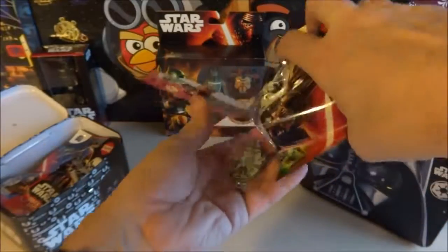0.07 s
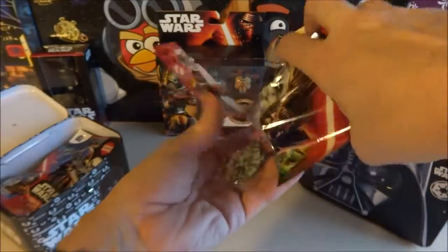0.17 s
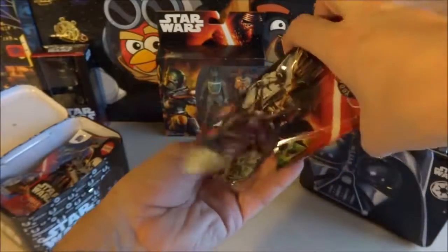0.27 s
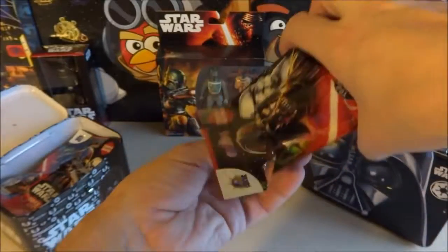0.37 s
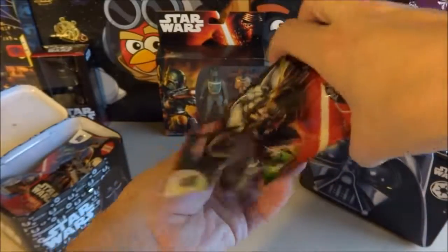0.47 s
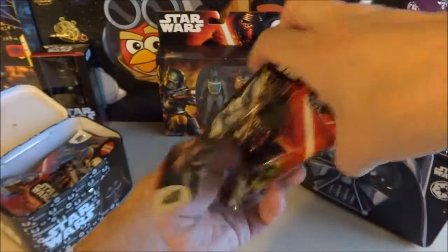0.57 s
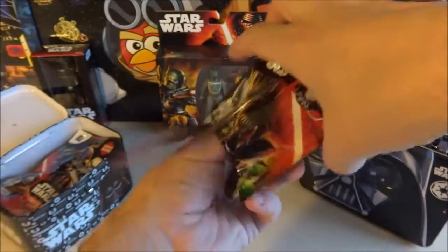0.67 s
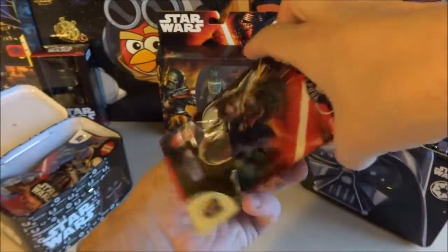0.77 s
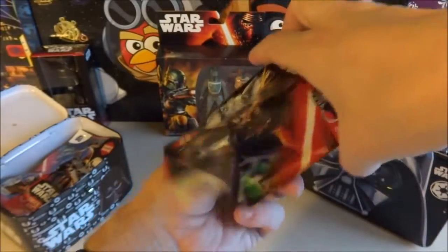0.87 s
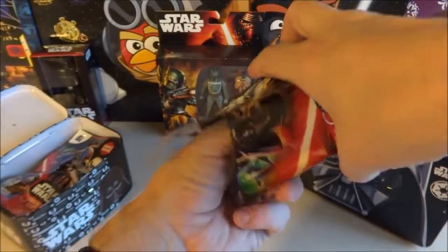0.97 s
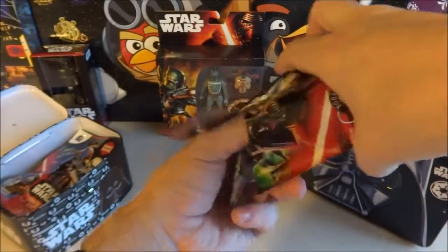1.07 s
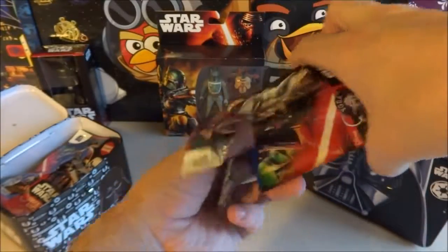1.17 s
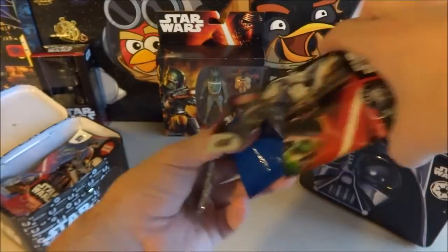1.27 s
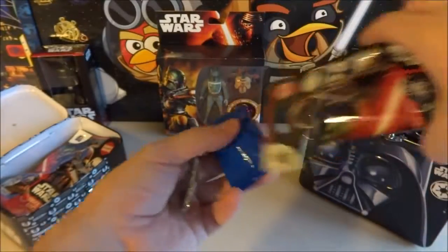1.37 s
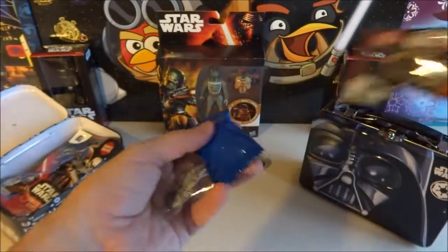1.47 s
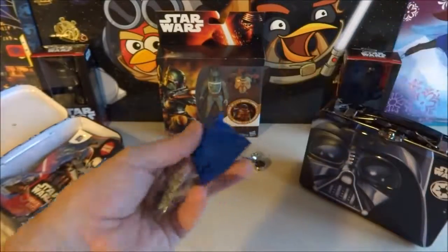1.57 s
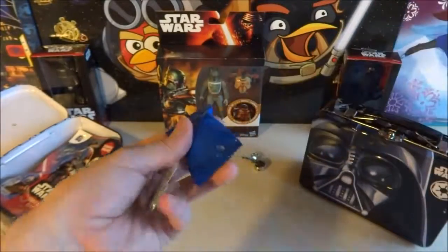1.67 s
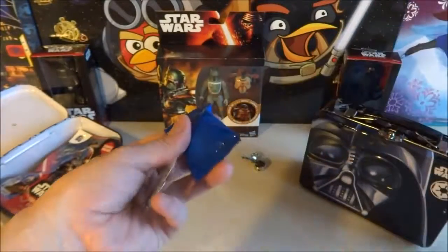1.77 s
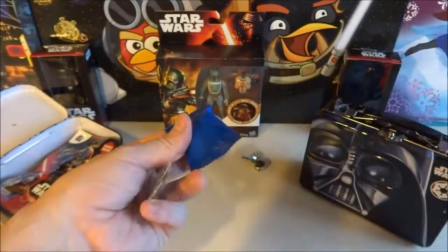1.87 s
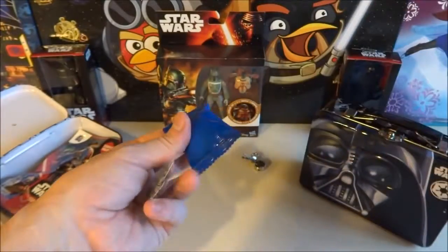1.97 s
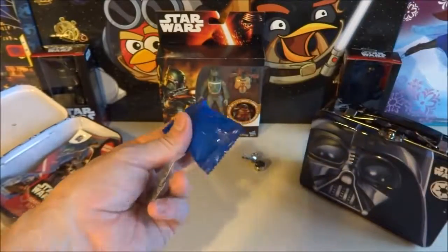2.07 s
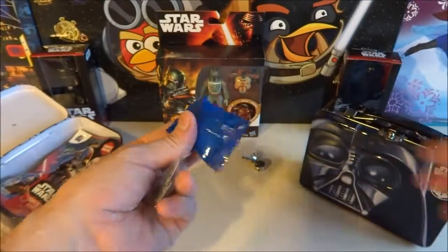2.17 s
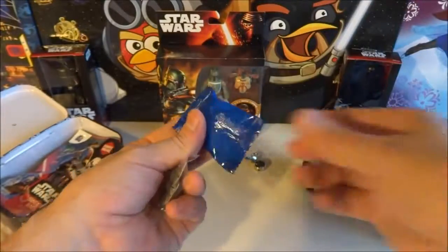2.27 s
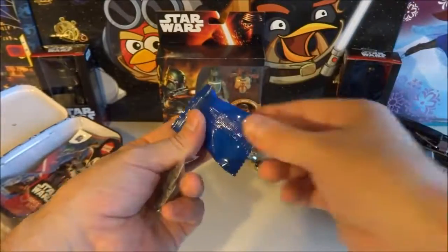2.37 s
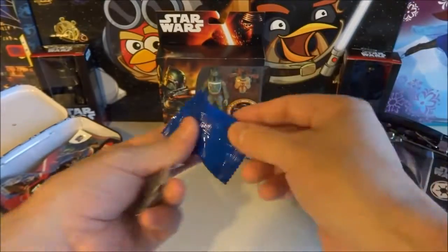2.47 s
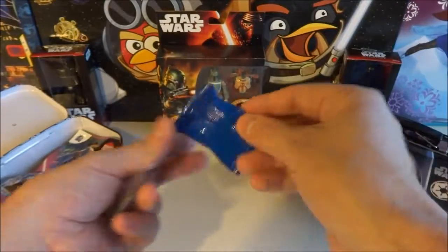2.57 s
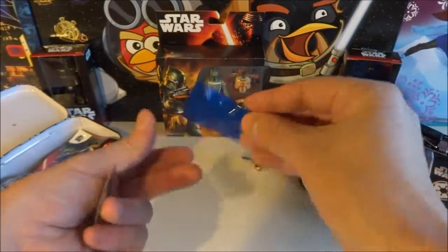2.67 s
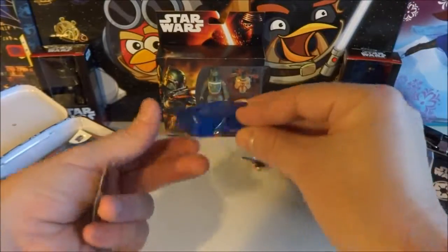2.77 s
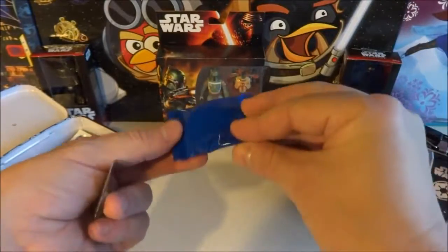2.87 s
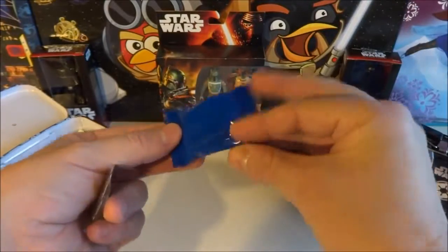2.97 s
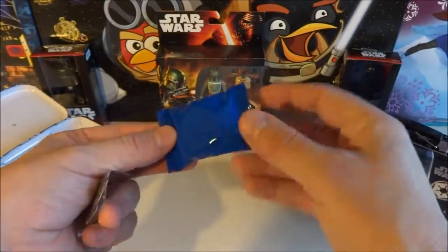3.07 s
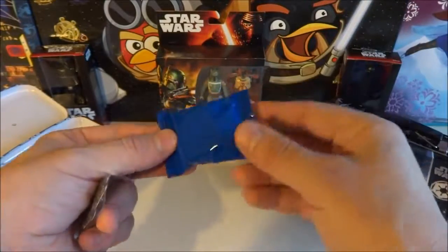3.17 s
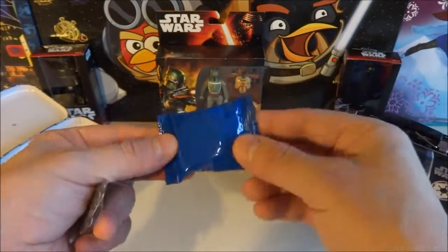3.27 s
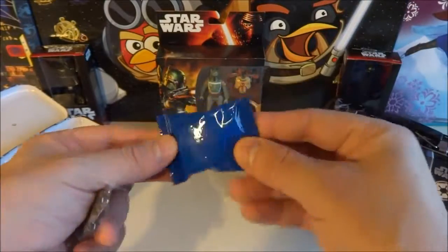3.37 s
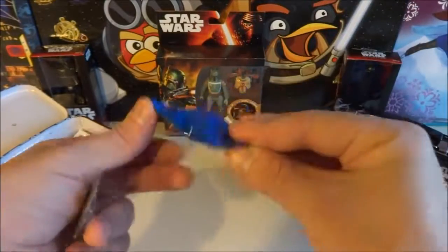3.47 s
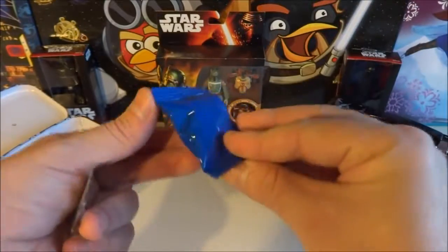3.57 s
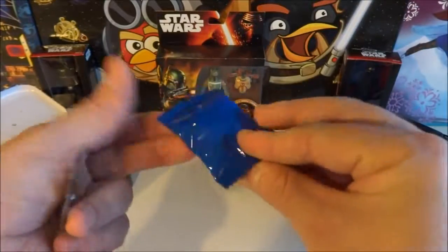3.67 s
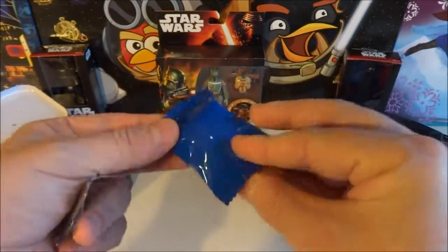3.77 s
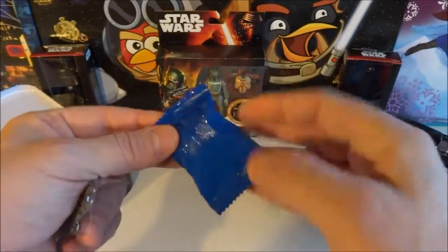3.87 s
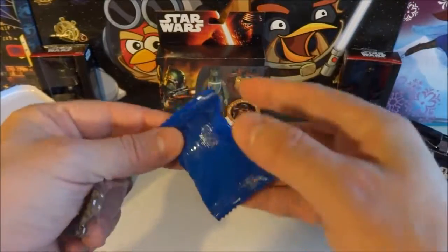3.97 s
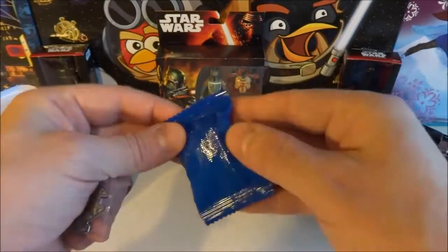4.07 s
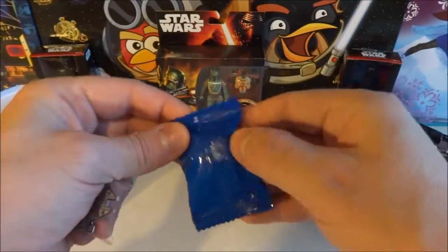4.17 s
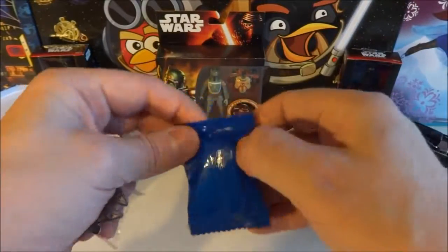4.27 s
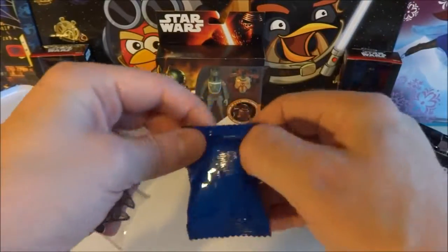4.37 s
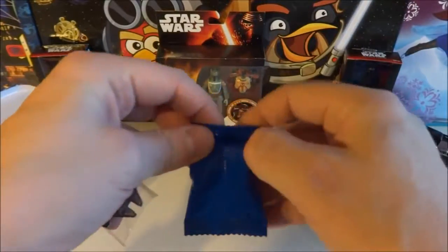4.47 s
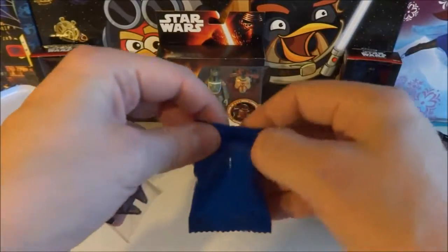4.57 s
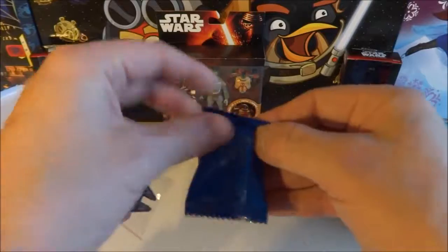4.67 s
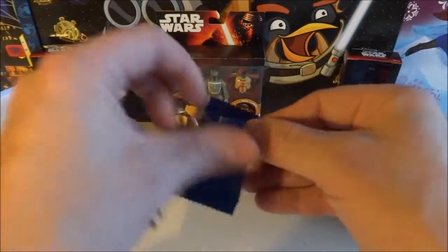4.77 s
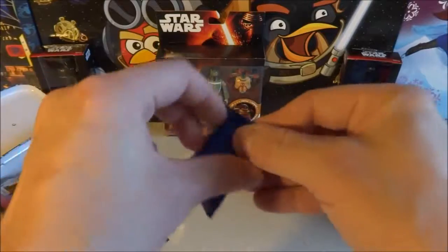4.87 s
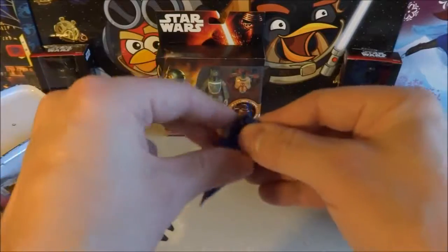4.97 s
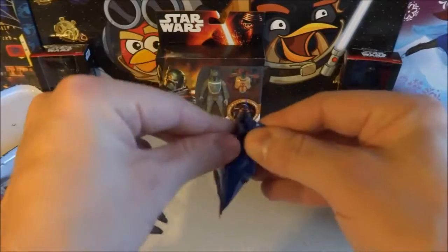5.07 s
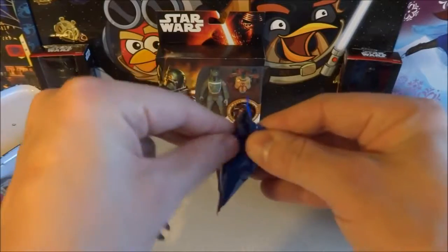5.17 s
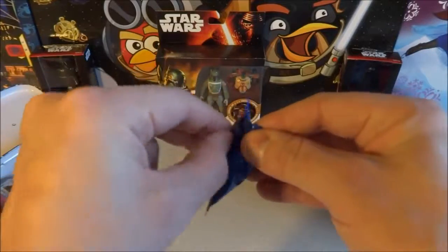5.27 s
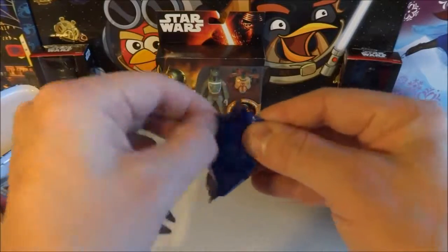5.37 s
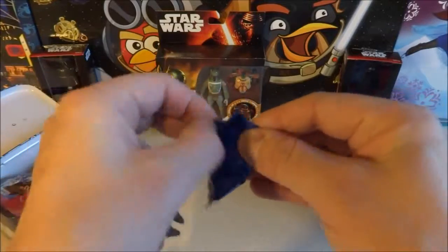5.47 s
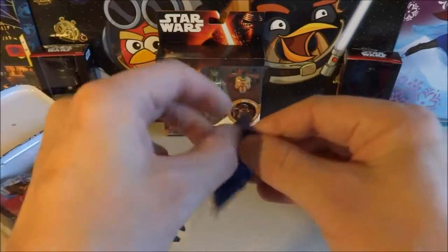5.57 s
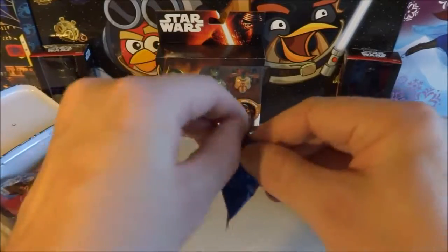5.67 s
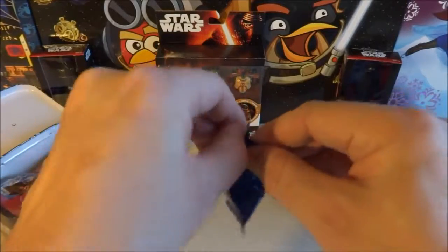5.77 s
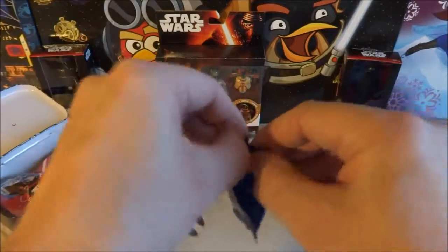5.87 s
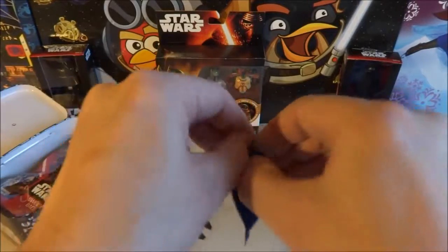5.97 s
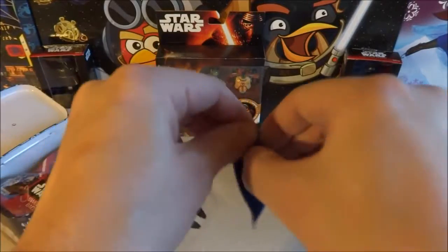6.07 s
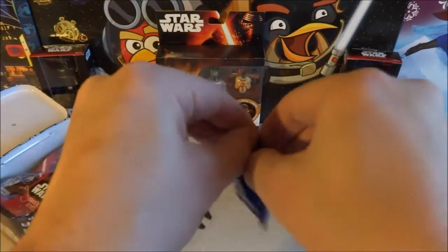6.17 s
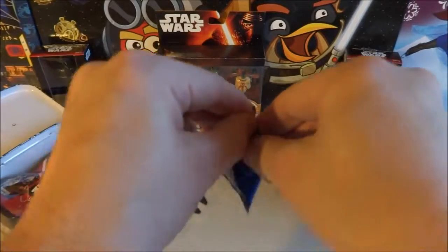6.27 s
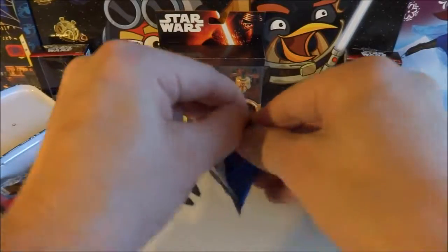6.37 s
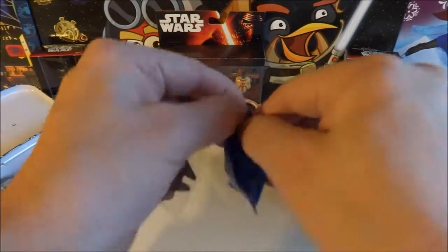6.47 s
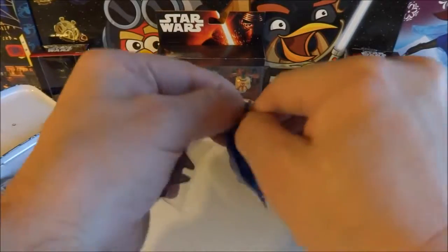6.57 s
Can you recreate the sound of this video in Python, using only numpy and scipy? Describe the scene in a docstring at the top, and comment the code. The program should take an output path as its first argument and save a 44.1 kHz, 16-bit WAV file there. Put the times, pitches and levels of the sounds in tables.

```python
"""Crinkly plastic film snaps and crumples: hands pull a small foil sachet out of a bag, turn it and pinch its seam.
Single creases snap as a click with a short flutter; collapsing folds are flurries of tiny clicks with larger cracks.
Between them the film rustles: filtered clicks and hiss follow how firmly the fingers slide.
A small room adds a fading noise tail to every film sound; soft air noise and a thin two-tone whine lie below."""
import sys
import numpy as np
from scipy import signal
from scipy.fft import rfft, irfft
from scipy.io import wavfile
from scipy.ndimage import uniform_filter1d, minimum_filter1d

SR = 44100
rng = np.random.default_rng(int(sys.argv[2]) if len(sys.argv) > 2 else 0)


def generate_wav(signal):
    """Clip the signal to [-1, 1] and save it as 16-bit WAV at the path in sys.argv[1]."""
    frames = np.transpose(np.atleast_2d(signal))
    scaled = np.clip(frames, -1, 1) * 32767
    pcm = np.round(scaled).astype(np.int16)
    wavfile.write(sys.argv[1], SR, pcm)


N = 292383  # length in samples
TIME = np.arange(N) / SR
TOP_HZ = 16300  # no sound is wanted above this
SIZE = 2048  # samples in a filter or in one crease sound
FREQS = np.maximum(np.fft.rfftfreq(SIZE, 1 / SR), 1)
BAG_STILL_S, BAG_GONE_S = 1.56, 2.15  # the bag's rustle stops; later snaps and folds are the sachet's
LOADING_S = 0.012  # a crease is loaded for this long before it flips

# folds that collapse: (start [s], length [s], level before mixing [dB], pitch of the facets [Hz])
FOLDS = [(0.004, 0.065, -28, 3280), (0.185, 0.044, -34, 5830), (0.598, 0.036, -21, 3080),
         (0.65, 0.09, -22.5, 3540), (0.749, 0.067, -28.5, 1620), (0.826, 0.041, -23.5, 2340),
         (0.951, 0.091, -23.5, 2930), (1.077, 0.033, -25, 2340), (1.161, 0.15, -29.5, 2630),
         (1.353, 0.098, -29.5, 3780), (2.018, .035, -29, 3340), (2.085, 0.05, -36.5, 1940),
         (3.053, .018, -25.5, 2900), (3.283, 0.027, -32.5, 1900), (3.384, 0.097, -29, 4600),
         (3.456, 0.097, -30, 2420), (3.878, .034, -22.5, 2650), (4.977, 0.073, -24, 3380),
         (5.066, 0.054, -29.5, 1510), (5.276, .055, -22.5, 2270), (5.4, .088, -20, 7000),
         (5.621, 0.072, -26, 1740), (5.955, 0.044, -20.5, 8000), (6, 0.051, -23.5, 7800),
         (6.049, .028, -23.5, 4700), (6.172, 0.042, -26.5, 11300), (6.22, 0.045, -20, 12700),
         (6.355, 0.051, -25.5, 15400), (6.586, .02, -32, 11100)]


def undb(db):
    """Turn decibels into a plain factor."""
    return 10 ** (np.asarray(db) / 20)


def unit(x):
    """Scale a signal to an average (RMS) level of 1."""
    return x / np.sqrt(np.mean(x ** 2) + 1e-18)


def colour(points, freqs=FREQS):
    """Draw a smooth gain curve through (frequency [Hz], level [dB]) points."""
    hz, db = np.transpose(points)
    return undb(np.interp(np.log(freqs), np.log(hz), db))


def ring(x, gain, spread_s=0.0):
    """Pass x through a body with this gain that rings only after it is struck; bass waves arrive after treble."""
    # folding the cepstrum puts the body's energy as early as possible
    cepstrum = irfft(np.log(gain + 1e-9))
    cepstrum[1:SIZE // 2] *= 2
    cepstrum[SIZE // 2 + 1:] = 0
    # bending waves: the delay grows as 1 / sqrt(frequency), from spread_s / 4 at the highest frequency
    lag = 2 * np.pi * spread_s * np.sqrt(FREQS * FREQS[-1]) / 2
    response = irfft(np.exp(rfft(cepstrum) - 1j * lag))[:SIZE // 2]
    return signal.oaconvolve(x, response)


def add(out, s, sound):
    """Mix a sound in at time s."""
    start = max(int(s * SR), 0)
    part = sound[:max(N - start, 0)]
    out[start:start + len(part)] += part


def facet(s, hz, q, sheet=0.084, ripple_db=3.0, count=40):
    """A damped facet of film stands out of its sheet's broad sound, with uneven side resonances of its own."""
    # broad sound of each film: (frequency [Hz], level [dB])
    bag_colour = [(60, -34), (150, -12.5), (287, -4), (470, -9), (730, -1), (1200, -1), (2100, -1),
                  (4200, -2), (10000, -14), (15500, -19)]
    sachet_colour = [(120, -50), (290, -27.5), (470, -26.5), (720, -7.5), (1300, -4), (2300, -2),
                     (3200, -1), (4900, -1.5), (10000, -6.5), (15500, -12)]
    film = colour(bag_colour if s < BAG_GONE_S else sachet_colour)
    detune = q * (FREQS / hz - hz / FREQS)
    resonance = 1 / (1 + detune ** 2)
    ripple_hz = np.geomspace(500, TOP_HZ, count)
    ripple = colour(np.transpose([ripple_hz, ripple_db * rng.standard_normal(count)]))
    return film * ripple * (sheet + resonance)


def crackle(count, per_s, spread_db, hiss):
    """Tiny buckles click at random moments, a few much larger than the rest, over friction hiss."""
    sizes = undb(spread_db * np.minimum(rng.exponential(size=count), 3))
    clicks = (rng.random(count) < per_s / SR) * sizes * rng.choice([-1, 1], count)
    return unit(clicks) + hiss * rng.standard_normal(count)


def background(air_db=-53.0):
    """Soft room noise is filtered noise, wider than mono; the steady thin whine is two sine waves."""
    # sound of the quiet room: (frequency [Hz], level [dB])
    air_colour = [(25, -15), (100, -10), (290, 2), (550, 8), (1200, 14.5), (4000, 7), (8000, -17),
                  (16000, -28)]
    # steady whine: (frequency [Hz], level [dB])
    whine_tones = [(823, -64.5), (1233, -62.5)]
    mid, side = (unit(ring(rng.standard_normal(N), colour(air_colour))[:N]) for _ in range(2))
    air = undb(air_db) * np.array([mid + side / 2, mid - side / 2])
    whine = sum(np.sqrt(2) * undb(db) * np.sin(2 * np.pi * hz * TIME) for hz, db in whine_tones)
    return air + whine


def effort(settle_db=-19.5, settle_s=0.031):
    """The film moves as the fingers slide, and goes on settling for a moment after each fold collapses."""
    # how firmly the fingers slide over the film: (time [s], level [dB])
    finger_slide = [(0, -35), (0.25, -44), (0.7, -33.5), (1.2, -33.5), (1.6, -41), (2.05, -38.5),
                    (2.36, -46.5), (2.52, -36.5), (3.25, -43), (3.5, -37.5), (3.93, -40.5), (4.08, -41),
                    (4.28, -40), (4.8, -34.5), (5.1, -38.5), (5.9, -32.5), (6.12, -41), (6.6, -36.5)]
    motion = undb(np.interp(TIME, *np.transpose(finger_slide)))
    for s, length, db, hz in FOLDS:
        settling = undb(db + settle_db) * np.exp(-TIME[:SR // 2] / settle_s)
        add(motion, s + length, settling)
    return motion


def ticks(s, per_s, lowest_hz, q=1.24, spread_s=0.000785, count=9):
    """Small facets of different pitch tick independently, each with a colour of its own."""
    total = 0
    for hz in np.geomspace(lowest_hz, TOP_HZ, count):
        grains = crackle(N, per_s, spread_db=6.5, hiss=0.55)
        total = total + ring(grains, facet(s, hz, q), spread_s)[:N]
    return unit(total)


def rustle(bag_db=-1, tick_db=-2, slide_db=-7, slide_hz=3800, firm_db=-38, bag_firm_db=-37):
    """A harder pull makes the bag crackle more; the sachet hisses under a light touch and ticks under a firm one."""
    motion = effort()
    # both reach their full value of 1 once the movement is firm
    grip = np.minimum(motion / undb(firm_db), 1)
    pull = np.minimum(motion / undb(bag_firm_db), 1)
    bag = undb(bag_db) * np.sqrt(pull) * ticks(0, per_s=90, lowest_hz=302)
    sachet = undb(tick_db) * grip ** 2 * ticks(BAG_GONE_S, per_s=16, lowest_hz=810)
    hiss = ring(rng.standard_normal(N), facet(BAG_GONE_S, slide_hz, 0.97, sheet=0.04))[:N]
    slide = undb(slide_db) * unit(hiss)
    return motion * np.where(TIME < BAG_STILL_S, bag, slide + sachet)


def buckle(s, hz, q, flutter=0.11, flutter_s=0.0026, shiver=0.027, shiver_s=0.0066,
           jerk=0.41, jerk_s=0.0033, creak=0.016, creak_s=0.013, spread_s=0.000142):
    """A crease creaks as it is loaded, flips with a click and two more jerks, and the sheet flutters briefly."""
    lead, window = int(LOADING_S * SR), int(0.004 * SR)
    t = TIME[:SIZE] - lead / SR  # the flip is at zero
    before = creak * np.exp(-np.abs(t) / creak_s)
    after = flutter * np.exp(-np.abs(t) / flutter_s) + shiver * np.exp(-np.abs(t) / shiver_s)
    push = rng.standard_normal(SIZE) * np.where(t < 0, before, after)
    push[lead] += 1
    jerk_moments = lead + (rng.random(2) * jerk_s * SR).astype(int)
    push[jerk_moments] += jerk * rng.uniform(-1.32, 1, 2)
    sound = ring(push * rng.choice([-1, 1]), facet(s, hz, q), spread_s)
    # level 1 over the first 4 ms of the flip
    return sound / np.sqrt(np.mean(sound[lead:lead + window] ** 2))


def snaps():
    """Single creases flip as the fingers change their grip."""
    # creases: (time [s], level over 4 ms before mixing [dB], pitch of the facet [Hz], resonance sharpness [Q])
    creases = [(0.0152, -22.5, 7900, 0.29), (0.0424, -19.5, 3200, 1.3), (0.347, -28, 2810, 0.78),
               (0.388, -29, 1690, 0.11), (0.5342, -26, 2520, .9), (0.6226, -15, 1800, 1.2),
               (0.7146, -14.5, 2360, 0.07), (0.8598, -17, 1180, 0.16), (1.000, -16, 3400, 0.062),
               (1.089, -10, 10960, 0.027), (1.1692, -13.5, 3880, .05), (1.2349, -15.5, 4030, 0.31),
               (1.4763, -22, 10960, 0.42), (1.4963, -14.5, 6260, 0.27), (1.6661, -19, 8080, 0.6),
               (1.762, -20.5, 4650, 0.36), (1.8682, -31, 5100, 0.12), (1.9539, -26, 14000, .4),
               (2.2247, -23.5, 3350, 1.7), (2.5254, -12.5, 840, 0.14), (2.6156, -15, 3930, 0.31),
               (2.64, -13.5, 3000, 0.64), (2.6625, -20.5, 7040, .55), (2.7399, -23, 2900, 0.54),
               (2.796, -23, 1770, 0.084), (2.8129, -16, 4740, 0.26), (2.862, -17.5, 5300, 1.9),
               (3.0531, -14, 700, 0.2), (3.1197, -14.5, 4250, 1.3), (3.245, -31, 3230, .7),
               (3.302, -16, 4800, 2.5), (3.4115, -16.5, 5560, .7), (3.5033, -16.5, 6320, 0.025),
               (3.5266, -16, 1970, 0.16), (3.5975, -9, 6760, 0.21), (3.701, -25, 5160, 1.4),
               (3.7147, -22, 3500, 0.092), (3.8392, -21.5, 3420, 5.8), (3.8544, -23.5, 2780, 0.3),
               (3.9028, -14, 1690, 0.064), (3.9815, -25, 13700, 0.52), (4.177, -18, 10960, .1),
               (4.209, -17, 3600, 0.032), (4.2396, -24, 4950, 0.29), (4.315, -13.5, 14000, 0.19),
               (4.3874, -16.5, 2780, 0.19), (4.4369, -17.5, 4470, 0.45), (4.5071, -18, 1400, 0.21),
               (4.6152, -21.5, 13170, 1.6), (4.6328, -15, 13900, .5), (4.7003, -16, 14000, 0.43),
               (4.7283, -12.5, 4260, 0.47), (4.7748, -17, 4470, 0.23), (4.7912, -20, 3070, 0.22),
               (4.8286, -15.5, 14000, 0.24), (4.9123, -22.5, 14000, 0.062), (4.9737, -15, 1360, 1.8),
               (5.0348, -14, 6270, 0.7), (5.1493, -14.5, 6500, 0.033), (5.2158, -17.5, 3830, 0.56),
               (5.3037, -18.5, 1640, 2.5), (5.3527, -22.5, 7900, 1.2), (5.389, -9.5, 6500, 1.1),
               (5.6192, -14, 1660, 0.36), (5.7563, -13, 12390, .27), (5.792, -21, 6000, 0.24),
               (5.8937, -21.5, 14000, 0.082), (6.1646, -21, 7800, 1.1), (6.2806, -17, 10310, 0.12),
               (6.4545, -25.5, 10900, 1.8), (6.5379, -17.5, 13100, 0.55), (6.5828, -21, 9700, 1.8),
               (6.614, -15, 8000, 0.53)]
    out = np.zeros(N)
    for s, db, hz, q in creases:
        add(out, s - LOADING_S, undb(db) * buckle(s, hz, q))
    return out


def crumples(q=0.29, octaves=1.0, per_s=420, spread_s=0.00081, count=4):
    """A fold gives way: a few facets of different pitch chatter, each in its own flurry of clicks."""
    out = np.zeros(N)
    chatter = [crackle(N, per_s, spread_db=3.5, hiss=0.28) for _ in range(count)]
    for s, length, db, hz in FOLDS:
        start, size = max(int(s * SR), 0), max(int(length * SR), 2)
        progress = np.linspace(0, 1, size)
        sound = 0
        for grains, step in zip(chatter, np.linspace(-1, 1, count)):
            # each flurry is strongest at its own random moment
            swell = np.exp(-((progress - rng.random()) / 0.5) ** 2)
            flurry = signal.windows.tukey(size, 0.3) * swell
            body = facet(s, hz * 2 ** (octaves * step), q)
            sound = sound + ring(grains[start:start + size] * flurry, body, spread_s)
        add(out, s, sound * undb(db) / np.sqrt(np.mean(sound[:size] ** 2)))
    return out


def cascades(above_db=4, scatter_db=1.5, octaves=0.57, q=0.66, count=3):
    """Each fold trips a few larger creases in turn: cracks near its pitch, with weak shiver and strong jerks."""
    out = np.zeros(N)
    for s, length, db, hz in FOLDS:
        moments = s + length * (np.arange(count) + rng.random(count)) / count
        for moment, (size, step) in zip(moments, rng.standard_normal((count, 2))):
            pitch = hz * 2 ** (octaves * step)
            crack = buckle(moment, pitch, q, flutter=0.12, shiver=0.014, jerk=0.62)
            add(out, moment - LOADING_S, undb(db + above_db + scatter_db * size) * crack)
    return out


def strays(above_db=9, scatter_db=4, centre_hz=4500, octaves=1.76, q=0.67, firm_db=-37, count=55):
    """Now and then a small crease flips anywhere in the film, strongly only while the grip is firm."""
    out, motion = np.zeros(N), effort()
    load = motion * np.minimum(motion / undb(firm_db), 1)
    moments = TIME[-1] * (np.arange(count) + rng.random(count)) / count
    for s, (size, step) in zip(moments, rng.uniform(-0.92, 1, (count, 2))):
        strength = np.interp(s, TIME, load) * undb(above_db + scatter_db * size)
        add(out, s - LOADING_S, strength * buckle(s, centre_hz * 2 ** (octaves * step), q))
    return out


def room(x, wet_db=-9.0, t60=0.31, treble_t60=0.27, split_hz=6000, gap_s=0.004):
    """The room answers after a few milliseconds with fading noise; the treble dies first and stays narrow."""
    t = TIME[:SR // 2]
    width, treble_width = 0.58, 0.25  # left-right difference against the middle
    tails = 0
    for kind, decay_s, spread in (("low", t60, width), ("high", treble_t60, treble_width)):
        band = signal.butter(2, min(split_hz, SR / 3), kind, fs=SR, output="sos")
        fade = np.exp(-np.log(1000) * t / decay_s) * (t > gap_s)  # falls by 60 dB in decay_s
        mid, side = signal.sosfilt(band, rng.standard_normal((2, len(t)))) * fade
        tails = tails + np.array([mid + spread * side, mid - spread * side])
    tails = tails / np.sqrt(np.sum(tails.mean(axis=0) ** 2))
    return x + undb(wet_db) * signal.fftconvolve(x, tails, axes=1)[:, :N]


def scene(snap_db=1.93, crumple_db=-2.0):
    """All the film sounds come from between the hands, a little to the right, over the room's background."""
    film = undb(snap_db) * snaps() + undb(crumple_db) * crumples() + cascades() + strays() + rustle()
    # left minus right: the bag is held further to the right
    bag_pan_db, sachet_pan_db = -1.1, -0.4
    pan_db = np.interp(TIME, [BAG_STILL_S, BAG_GONE_S], [bag_pan_db, sachet_pan_db])
    stereo = film * undb(np.array([pan_db, -pan_db]) / 2)
    return room(stereo) + background()


def record(dry, ceiling=0.82):
    """A fast limiter holds down the tallest peaks; a steep filter before and after it cuts the top."""
    top_cut = signal.ellip(10, 0.2, 70, TOP_HZ, fs=SR, output="sos")
    sound = signal.sosfilt(top_cut, dry)
    hold = int(0.001 * SR)
    wanted = np.minimum(1, ceiling / (np.abs(sound).max(axis=0) + 1e-9))
    # hold the lowest gain around each peak, then smooth it
    gain = uniform_filter1d(minimum_filter1d(wanted, hold), hold)
    return signal.sosfilt(top_cut, sound * gain)


dry = scene()
out = record(dry)
generate_wav(out)
```